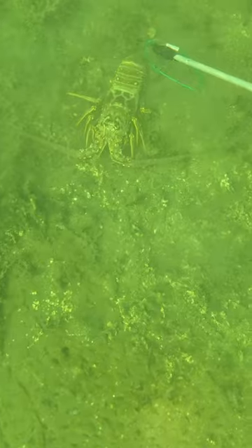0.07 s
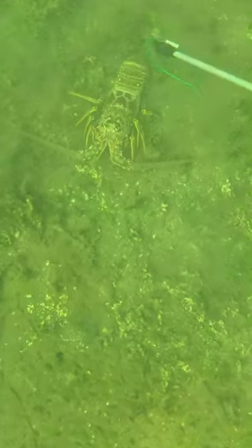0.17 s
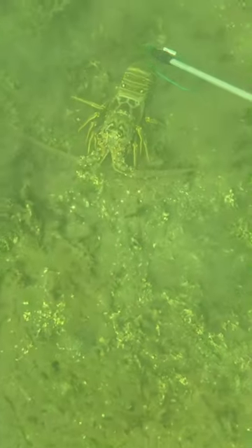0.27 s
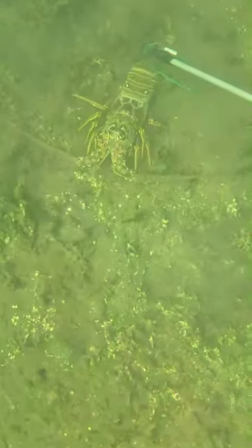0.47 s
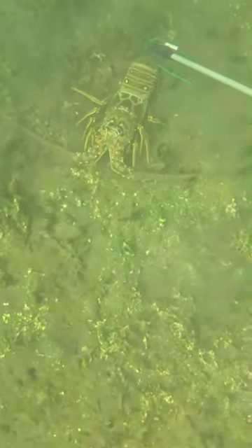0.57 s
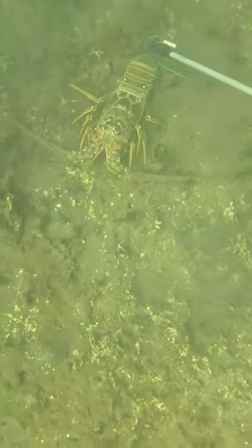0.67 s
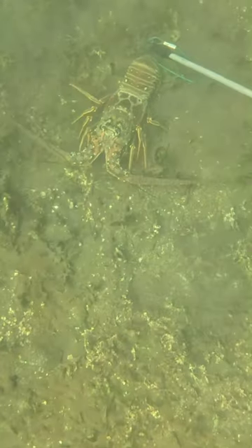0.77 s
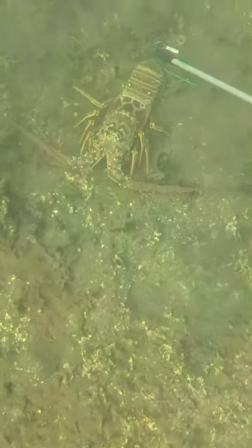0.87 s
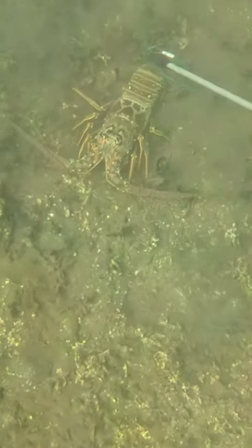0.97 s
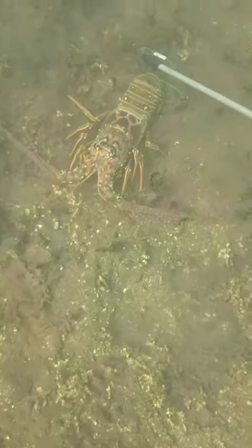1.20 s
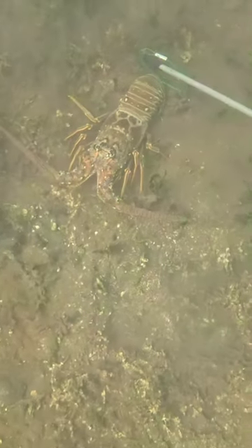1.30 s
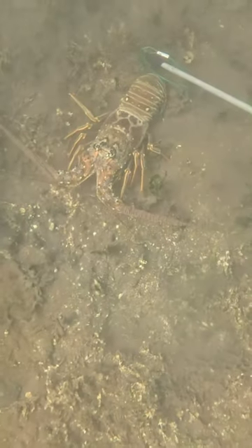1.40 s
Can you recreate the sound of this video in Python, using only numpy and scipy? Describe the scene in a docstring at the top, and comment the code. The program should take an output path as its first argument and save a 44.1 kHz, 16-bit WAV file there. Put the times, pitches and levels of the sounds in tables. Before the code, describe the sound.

Snapping shrimp click irregularly throughout, sharp close snaps spread wide over a faint distant crackle, heard underwater from a camera case. At about 0.2 seconds a pocket of air gives one deep glug. Gurgles follow, strongest around 0.5 seconds and fading by 1 second, with a few small ringing bubbles until 1.4. The loudest snap comes near 0.7 seconds. Moving water rumbles low underneath.

```python
"""Sharp clicks of snapping shrimp, near and far, on a shallow seabed, heard from a waterproof camera case.
Each snap is a crack and a pressure pulse that rings the case. A large pocket of air gives one deep glug,
followed by a fading run of gurgles and a few small ringing bubbles. Underneath, moving water rumbles
against the case and churns behind the gurgles."""
import sys
import numpy as np
from scipy import signal
from scipy.fft import rfft, irfft
from scipy.io import wavfile
from scipy.ndimage import uniform_filter1d

SR = 44100
rng = np.random.default_rng(int(sys.argv[2]) if len(sys.argv) > 2 else 0)


def put_to_file(sound):
    """Save the sound as 16-bit audio at rate SR, in the file named by the first command-line argument."""
    columns = np.atleast_2d(sound).T  # one column per channel
    safe = np.clip(columns, -1, 1)
    whole_steps = np.round(safe * 32767)
    wavfile.write(sys.argv[1], SR, whole_steps.astype(np.int16))


N = 63945
T = np.arange(N) / SR
AGE = T[:N // 8]  # seconds since the start of one event
SIDE = np.array([[.5], [-.5]])  # splits a difference between left and right
CRACK_TOP_HZ, CASE_TOP_HZ = 6740, 8600


def near_snaps(case):
    """Shrimp snap close to the case, each with its own colour."""
    # start_s, level_db, tilt_db_per_octave, peak_hz
    snaps = [(0.0375, -25.5, 0.5, 1640), (0.0629, -42, 2, 3000), (0.0866, -27, -3, 4070),
             (0.1295, -34.5, -1.5, 2300), (0.2042, -34.5, -0.5, 3800), (0.208, -25.5, 2, 1550),
             (0.2961, -38, 2, 2630), (0.3693, -38.5, 9, 6020), (0.4252, -27.5, 3.5, 1470),
             (0.554, -37, 0, 3330), (0.599, -35, -3, 2600), (0.6887, -12.5, 2, 2100),
             (0.8039, -27.5, -1, 2220), (0.8862, -38.5, -1.5, 1790), (0.9117, -42, 6, 4250),
             (0.9607, -23, -2, 2360), (1.0158, -38, 10.5, 1740), (1.0430, -22, 1, 1610),
             (1.0780, -30, 3, 2580), (1.1047, -21, 3.1, 1830), (1.2611, -20.5, 4, 2520),
             (1.359, -38.5, 1.5, 7400), (1.368, -36.5, 1.5, 2670), (1.4120, -30, -0.5, 1740)]
    out = np.zeros((2, N))
    for at, db, tilt_db, peak_hz in snaps:
        add(out, at, undb(db) * snap(case, tilt_db, peak_hz) * np.sqrt(0.0053 * SR))
    return out


def snap(case, tilt_db, peak_hz, peak_db=8.5):
    """A crack, plus a pulse that rings the case with its dull echoes off bed and surface; unit energy."""
    pulse = smeared_pulse() + undb(-7) * lowpass(burst(decay_s=0.0076), 6000)
    body = signal.fftconvolve(case, pulse[None, :len(AGE) // 2])[:, :len(AGE)]
    body = lowpass(body, CASE_TOP_HZ)
    puff = burst(decay_s=0.00069)
    crack = lowpass(puff, CRACK_TOP_HZ) + undb(-22) * lowpass(puff, 12000)
    click = colour(body + undb(-10) * crack, tilt_db, peak_hz, peak_db)
    return click / np.sqrt(np.sum(click ** 2))


def smeared_pulse(smear_s=.0036, step_hz=600):
    """A pulse with a flat spectrum whose pitches arrive by paths of slightly different length."""
    hz = np.fft.rfftfreq(len(AGE), 1 / SR)
    steps = np.arange(0, SR / 2, step_hz)
    delay_s = np.interp(hz, steps, smear_s * rng.random(len(steps)))
    return irfft(np.exp(-2j * np.pi * np.cumsum(delay_s) * hz[1]), len(AGE))


def case_ring():
    """Ring of the case at its two microphones after one sharp pressure pulse."""
    # resonances of the case: pitch_hz, relative_db, t60_s, left_minus_right_db, left_lag_rad
    modes = [(570.5, -18, 0.12, 10.5, -2.2), (818, -6, 0.028, 18.5, -1.2), (1315, 3.5, 0.015, -14, 1.24),
             (1592, 4, 0.019, -0.5, -0.75), (1797, 4.5, 0.011, 9.5, 2.28), (2282, -2, 0.021, 3.5, 2.06),
             (2666, -0.5, 0.018, 10, 1.7), (2995, -8.5, 0.021, 13.5, 0.48),
             (3970, -6.5, 0.012, -1.5, -0.16), (4370, -4.5, 0.015, -3.5, -0.27),
             (4912, 1.5, 0.012, -3, -0.59), (5800, -12.5, 0.01, -0.5, -1.4), (6770, -4, 0.0052, 7.5, -0.3)]
    ring = 0
    for hz, db, t60, pan_db, lag in modes:
        decay = np.exp(-np.log(1000) * AGE / t60)
        ring += undb(db + pan_db * SIDE) * np.cos(2 * np.pi * hz * AGE - lag * SIDE) * decay
    ring = lowpass(ring, CRACK_TOP_HZ)
    return ring / np.sqrt(np.sum(ring ** 2) / 2)


def deep_glug():
    """A large pocket of air wobbles, its pitch sinking, and shoves water against the case."""
    # tones of the glug: start_s, level_db, start_hz, end_hz, glide_s, rise_s, fall_s
    tones = [(.163, -5, 241, 118.7, 0.0163, 0.013, 0.018), (.1625, -15, 540, 295, 0.018, 0.0088, 0.0082),
             (.219, -21.5, 165, 118, 0.049, 0.0032, 0.015), (.224, -36.5, 428, 450, 0.086, 0.01, 0.01)]
    # spectrum of the shoved water: frequency_hz, relative_db
    surge_spectrum = [(15, -22.5), (55, 0.5), (100, 3.5), (220, -10), (330, -9), (480, -29), (650, -36),
                      (1500, -58)]
    out = np.zeros(N)
    for at, db, start_hz, end_hz, glide_s, rise_s, fall_s in tones:
        add(out, at, undb(db) * glide(start_hz, end_hz, glide_s) * swell(rise_s, fall_s))
    surge = unit(noise(surge_spectrum)[:len(AGE)]) * swell(rise_s=0.004, fall_s=0.026)
    add(out, .162, undb(-11.5) * surge)
    return out


def gurgles(case):
    """Each pocket of air taps the case, rings briefly and splashes a little, with a fast falling sweep."""
    # pockets of air: start_s, ring_db, ring_hz, sweep_db
    pockets = [(0.332, -39.5, 449, -46.5), (0.381, -49, 565, -36.5), (0.421, -26, 547, -28),
               (0.4429, -26.5, 554, -26.5), (0.4691, -20.5, 555, -36.5), (0.4794, -15.5, 539, -23),
               (.503, -18.5, 523, -23.5), (0.552, -19, 498, -28), (0.572, -34.5, 497, -34),
               (0.594, -28, 457.6, -25.5), (0.633, -35, 556, -27), (.648, -27, 542, -26),
               (0.677, -31, 559, -27.5), (0.705, -40, 557, -36), (0.729, -36, 566, -37),
               (0.757, -50, 433, -30), (0.794, -44, 436, -36), (.830, -41.5, 443, -38),
               (.871, -44, 588, -41), (.913, -31.5, 559, -36.5), (0.953, -42, 556, -42.5),
               (1.438, -31.5, 511, -77)]
    ring_envelope = swell(0.0067, fall_s=0.005) + undb(-27.5) * swell(0.0067, fall_s=0.14)
    sweep = glide(start_hz=641, end_hz=112, glide_s=0.00613) * swell(0.0062, 0.0048)
    out = np.zeros((2, N))
    for at, ring_db, hz, sweep_db in pockets:
        ring = np.sin(2 * np.pi * hz * AGE) * ring_envelope
        splash = unit(lowpass(rng.standard_normal(len(AGE)), 950)) * swell(0.0022, .008)
        knock = snap(case, tilt_db=-13.5, peak_hz=hz) * np.sqrt(0.003 * SR)
        plop = sweep + undb(-12) * splash + undb(-9) * knock
        add(out, at, undb(ring_db) * ring + undb(sweep_db) * plop)
    return out


def bubbles():
    """Single bubbles ring with a slight rise in pitch."""
    # small bubbles: start_s, level_db, pitch_hz, fall_s
    blips = [(.062, -37, 603, 0.018), (.329, -49, 1105, 0.013), (.752, -37, 444, 0.042),
             (.793, -37.5, 860, .003), (.800, -35, 487.6, 0.038), (.829, -35, 820, 0.0042),
             (.872, -41, 975, 0.0027), (0.910, -36.5, 975, 0.0066), (.954, -32, 904, 0.0046),
             (.957, -40.5, 586, 0.045), (.996, -44.5, 1220, .002), (1.162, -41, 1060, 0.0014),
             (1.345, -30, 765, 0.0089), (1.439, -40, 1176, 0.036)]
    out = np.zeros(N)
    for at, db, hz, fall_s in blips:
        add(out, at, undb(db) * glide(hz * .97, hz * 1.03, fall_s) * swell(0.005, fall_s))
    return out


def water():
    """Flow rumbles on the case, and water churns behind the gurgles."""
    # spectra of the rumble and the churn: frequency_hz, relative_db
    rumble_spectrum = [(5, 10.5), (14, 7.5), (28, -2), (48, -3.5), (75, -16.5), (110, -19.5), (170, -50.5),
                       (260, -66.5), (500, -89)]
    churn_spectrum = [(60, -21.5), (125, 9.5), (190, -4.5), (270, -3.5), (350, -26.5), (450, 0),
                      (560, -9.5), (850, -14.5), (1500, -31.5), (4000, -45)]
    # their swells and dips: time_s, level_db
    rumble_levels = [(0, -30), (.25, -24.5), (.37, -27.5), (.45, -30), (.53, -39.5), (.62, -29),
                     (.77, -38.5), (.88, -26), (.98, -22.5), (1.08, -31), (1.2, -25), (1.32, -34.5),
                     (1.45, -34.5)]
    churn_levels = [(0, -55.5), (.35, -55), (.48, -37.5), (.7, -39.5), (.85, -49), (1.05, -54.5),
                    (1.45, -74)]
    flow = noise(rumble_spectrum)
    steady_flow = flow / np.sqrt(uniform_filter1d(flow ** 2, SR // 6))
    return steady_flow * fader(rumble_levels) + noise(churn_spectrum) * fader(churn_levels)


def far_snaps(case, snaps_per_s=170, groups=12):
    """Many distant shrimp merge into a crackle, in groups of different colour."""
    crackle = 0
    for hz in np.geomspace(1230, 7000, groups):
        chance, strength, polarity = rng.random((N, 3)).T
        size = undb(2.6 * np.minimum(-np.log(strength), 4)) * np.sign(polarity - .5)
        pulses = (chance < snaps_per_s / groups / SR) * size
        click = snap(case, tilt_db=-0.7, peak_hz=hz, peak_db=10)
        crackle += signal.oaconvolve(click, pulses[None])[:, :N]
    return undb(-49.5) * unit(lowpass(crackle, CASE_TOP_HZ))


def distant_bed(case, flicker_db=2):
    """Far shrimp over a faint, flickering wash; the two swell and dip together."""
    # spectrum of the watery wash: frequency_hz, relative_db
    wash_spectrum = [(100, -25), (280, -11), (430, 6.5), (510, 0.5), (565, 13.5), (650, -11), (790, 2.5),
                     (980, -23.5), (1500, -15), (3500, -17), (7500, -22.5), (16000, -58)]
    # swells and dips of crackle and wash: time_s, gain_db
    bed_levels = [(0, -1), (.23, 5.5), (.27, -6.5), (.36, -0.5), (.81, -1), (.86, -7.5), (.92, 0.5),
                  (1.45, -3.5)]
    wash = noise(wash_spectrum) * undb(-52 + flicker_db * walk(rate_hz=29.97))
    return (far_snaps(case) + wash) * fader(bed_levels)


def undb(db):
    """Decibels to gain."""
    return 10 ** (np.asarray(db) / 20)


def unit(x):
    """Scale to rms 1."""
    return x / np.sqrt(np.mean(x ** 2))


def fader(points):
    """A gain curve through (time_s, level_db) points."""
    return undb(np.interp(T, *np.array(points).T))


def add(out, at, x):
    """Mix x in at a time in seconds."""
    i = max(int(at * SR), 0)
    n = max(min(x.shape[-1], N - i), 0)
    out[..., i:i + n] += x[..., :n]


def lowpass(x, hz):
    """Steep low-pass."""
    return signal.sosfilt(signal.butter(4, hz, fs=SR, output="sos"), x)


def colour(x, tilt_db, peak_hz, peak_db, width_octaves=.22):
    """Tilt by dB per octave and lift one peak; the curve is flat below 1 kHz and above 7 kHz."""
    n = x.shape[-1]
    hz = np.clip(np.fft.rfftfreq(2 * n, 1 / SR), 1000, 7000)
    slope = tilt_db * np.log2(hz / 2500)
    peak = peak_db * np.exp(-.5 * (np.log2(hz / peak_hz) / width_octaves) ** 2)
    return irfft(rfft(x, 2 * n) * undb(slope + peak))[..., :n]


def noise(spectrum):
    """Noise of rms 1 with a given spectrum and nothing above its last point."""
    hz, db = np.array(spectrum).T
    bins_hz = np.fft.rfftfreq(N, 1 / SR) + 1e-3
    gain = undb(np.interp(np.log(bins_hz), np.log(hz), db, right=-np.inf))
    return unit(irfft(rfft(rng.standard_normal(N)) * gain, N))


def walk(rate_hz):
    """Smooth random wandering with a spread of 1."""
    hold = int(SR / rate_hz)
    steps = np.repeat(rng.standard_normal(N // hold + 1), hold)
    return unit(uniform_filter1d(steps, hold)[:N])


def burst(decay_s):
    """A decaying puff of noise with unit energy."""
    puff = rng.standard_normal(len(AGE)) * np.exp(-AGE / decay_s)
    return puff / np.sqrt(np.sum(puff ** 2))


def swell(rise_s, fall_s):
    """Smooth rise to 1, then exponential decay."""
    attack = np.sin(np.pi / 2 * np.minimum(AGE / rise_s, 1)) ** 2
    return attack * np.exp(-np.maximum(AGE - rise_s, 0) / fall_s)


def glide(start_hz, end_hz, glide_s):
    """A sine whose pitch settles from one frequency to another."""
    hz = end_hz + (start_hz - end_hz) * np.exp(-AGE / glide_s)
    return np.sin(2 * np.pi * np.cumsum(hz) / SR)


def scene():
    """Snaps spread wide, gurgles and bubbles sit slightly left, glug and water stay in the centre."""
    case = case_ring()
    bubbling = (gurgles(case) + bubbles()) * undb(1.5 * SIDE)
    return near_snaps(case) + distant_bed(case) + water() + deep_glug() + bubbling


def record(dry, start_s=0.0347, top_hz=16000):
    """The sound opens after a short silence; the top is cut."""
    opening = np.clip((T - start_s) / 0.0014, 0, 1)
    return signal.sosfilt(signal.ellip(8, .2, 80, top_hz, fs=SR, output="sos"), dry * opening)


dry = scene()
out = record(dry)
put_to_file(out)
```